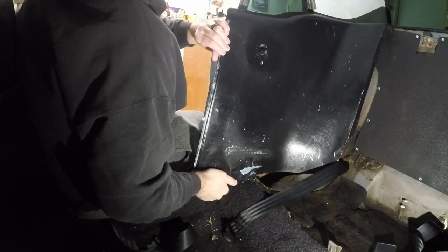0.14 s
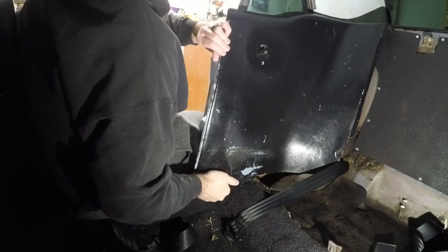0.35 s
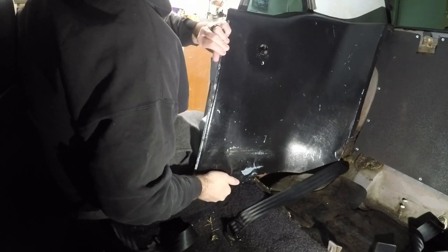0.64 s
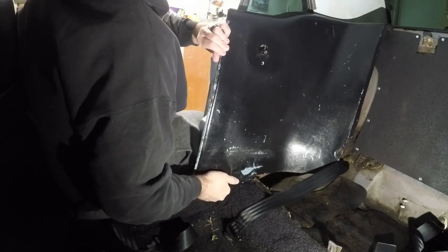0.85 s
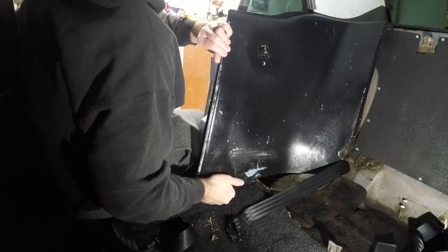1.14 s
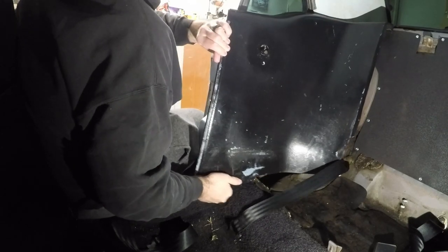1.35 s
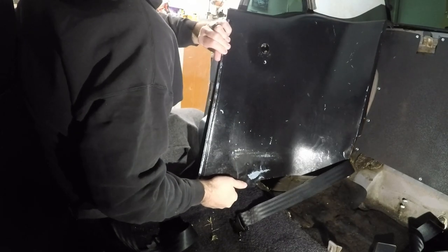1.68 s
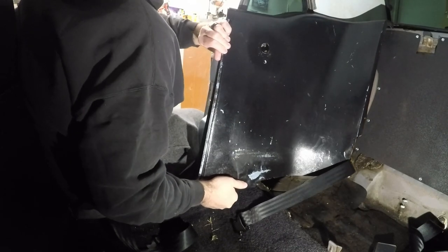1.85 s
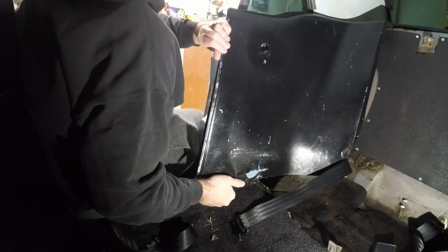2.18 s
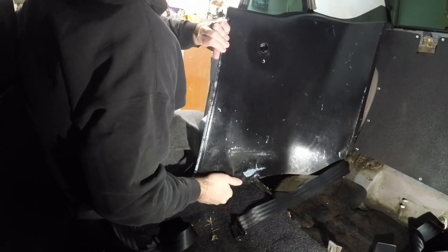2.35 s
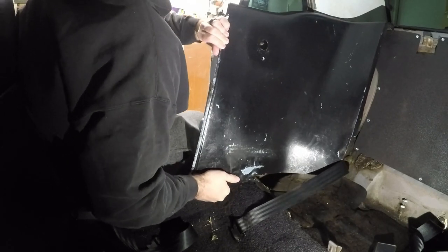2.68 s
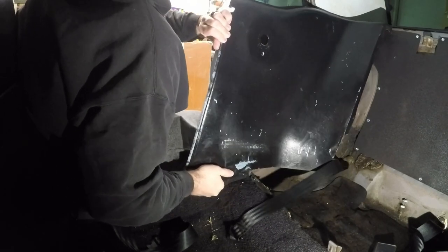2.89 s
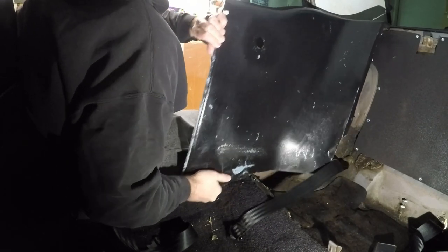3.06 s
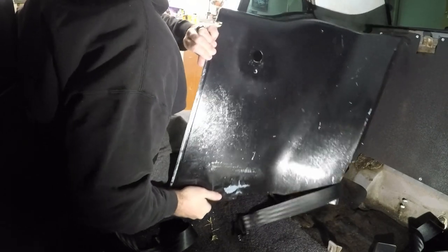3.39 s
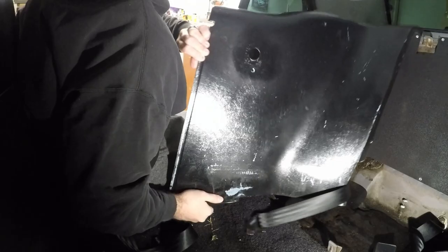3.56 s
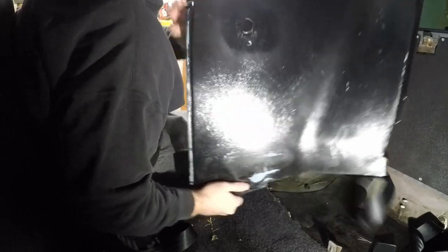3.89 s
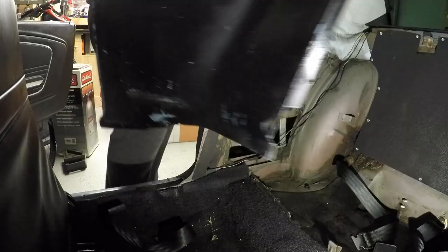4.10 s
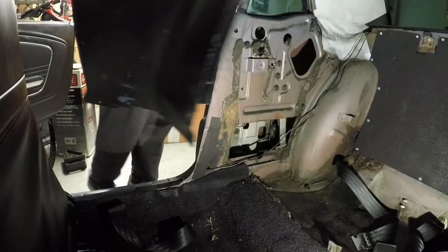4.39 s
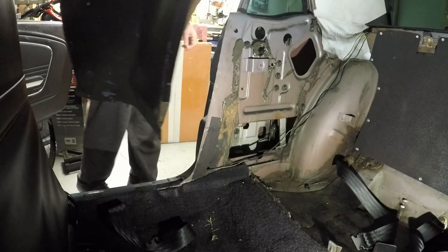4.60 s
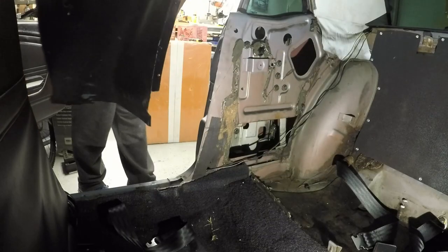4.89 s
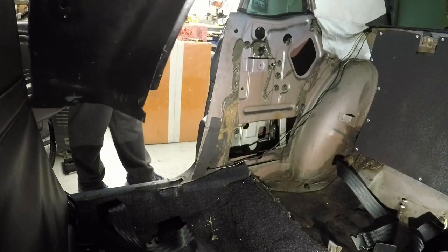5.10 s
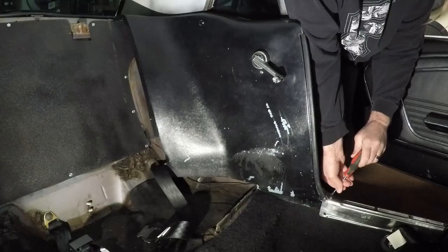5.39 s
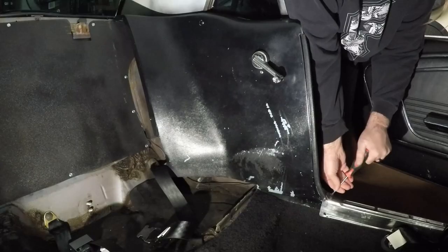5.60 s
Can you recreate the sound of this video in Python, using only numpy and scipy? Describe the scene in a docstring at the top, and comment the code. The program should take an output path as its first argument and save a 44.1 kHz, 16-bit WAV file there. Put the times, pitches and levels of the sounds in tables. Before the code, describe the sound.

Inside a car in a garage, a close, small microphone hears a large trim panel tugged free. At about 0.1 s a snap and heavy hollow thump boom through the shell. Thin squeaks and low creaks stutter from 0.3 to 0.9 s, with a dull thud at 0.9. Small knocks and scuffs lead to a strong crack and thump at 1.4 s, then lighter rubbing. Rough scuffs and a deep blow come at 2.5 s, followed by a very loud sharp snap at 2.75 with rattly knocks. Gritty scraping continues from 2.8 to 4.1 s, belt webbing hissing around 3.3 and 3.9. At 3.97 s a short hard hit overdrives the microphone, with a bright steel buckle clink and brief low note. Sound drops abruptly at 4.14: faint rubbing, panel rumble, wandering low boom, mains hum and thin whine, with a tiny click near 5.4 s.

```python
"""In a garage, a small microphone inside a car hears a large trim panel worked loose from the inner wall nearby.
Clips snap and edges scuff as shaped bursts of noise; the panel thumps, creaks and scrapes through its resonances.
A steel belt buckle clinks as decaying pairs of sines, and the webbing slides as noise in broad bands.
The car shell booms on a wandering low tone; behind it lie room noise, mains hum and a faint whine."""
import sys
import numpy as np
from scipy import signal
from scipy.fft import rfft, irfft
from scipy.io import wavfile
from scipy.ndimage import uniform_filter1d

SR = 44100
rng = np.random.default_rng(int(sys.argv[2]) if len(sys.argv) > 2 else 0)


def to_wav(s):
    """Save 16-bit WAV."""
    ch = np.atleast_2d(s).T  # columns
    pcm = np.round(np.clip(ch, -1, 1) * 32767)  # PCM
    wavfile.write(sys.argv[1], SR, pcm.astype(np.int16))


N = 253134
TOP_HZ = SR / 2.2  # upper edge of the widest treble bands

# the panel knocking on the wall: start_s, peak_db, blow_pitch_hz, ring (factor on the modes' ring time),
# narrow_db (lost one octave off the blow's pitch, growing as octaves squared)
THUMPS = [(0.033, -17.5, 202, 1, 16), (.085, -11.5, 415, 0.77, 2.5), (0.114, 0.5, 91, 0.62, 5),
          (.331, -18.5, 149, 0.93, 6.5), (0.477, -29, 330, 0.55, 6), (0.738, -18.5, 205, 1, 3.5),
          (.822, -19, 472, 0.22, 23), (0.926, -5.5, 78, 0.58, 1), (1, -35, 201.4, 0.93, 1),
          (1.058, -15.5, 138, 0.91, 7), (1.219, -16, 193, 1, 8), (1.394, -10, 202, 0.59, 19),
          (1.414, -10, 244, 0.37, 27), (1.439, -1.5, 150, 0.68, 1), (1.591, -15.5, 109.2, 1, 11),
          (1.907, -18, 317, 0.35, 8), (2.165, -34, 162, 0.81, 21), (2.377, -15, 133, 1, 6),
          (2.528, 0, 104, 1, 1), (2.559, -16, 90.8, 0.67, -0.5), (2.7445, 0, 413, 0.6, 2),
          (2.811, -9, 335, 1, 7), (2.85, -15, 692, 1, 30), (3.067, -21.5, 106, 0.44, 3),
          (3.154, -27.5, 810, 0.88, -1), (3.966, 8, 349, 0.16, 9), (4.116, -48, 200, 0.63, 12),
          (4.372, -39.5, 200, 0.93, 22)]
# resonances of the whole panel: pitch_hz, width_hz, level_db
PANEL = [(60.9, 2, -6), (96.6, 5.7, 8), (112.7, 4.2, 5), (140.8, 8.9, 2), (167.8, 45, -4), (199.7, 18, -4),
         (259.7, 26.4, -7.5), (343.6, 8, -2), (385, 15, -10.5), (463, 69, -18), (556, 108, -15),
         (603, 140, -17.5), (790, 32, -11.5), (942, 23, -14.5)]
# resonances of the panel's thin edge: pitch_hz, width_hz, level_db
EDGE = [(1320, 50, 0), (1580, 50, -2), (1930, 60, -1), (2550, 30, -3), (2950, 60, -4), (3370, 50, -4),
        (3810, 80, -4), (4430, 80, -5), (5200, 80, -7), (6300, 150, -8)]


def gain_of(db):
    """Decibels to gain."""
    return 10 ** (np.asarray(db) / 20)


def evened(x):
    """Scales to rms 1."""
    return x / np.sqrt(np.mean(x ** 2) + 1e-20)


def curves(rows):
    """Draws each column of a table of times as straight lines, at every sample."""
    s, *columns = np.vstack(rows).T
    return [np.interp(np.arange(N) / SR, s, column) for column in columns]


def swells(rows, rise_s, fall_s):
    """Sum of swells, each with a rounded rise and an exponential fall, from rows of peak_s, level_db."""
    t = np.arange(0, N, 64) / SR  # a coarse grid is enough for slow swells
    out = np.zeros(len(t))
    for peak_s, db in rows:
        rising = np.exp(-((t - peak_s) / rise_s) ** 2)
        falling = np.exp(-abs(t - peak_s) / fall_s)
        out += gain_of(db) * np.where(t < peak_s, rising, falling)
    return np.interp(np.arange(N) / SR, t, out)


def add(mix, start_s, sound):
    """Mixes a sound in at its start time, cut at the end of the mix."""
    part = mix[round(start_s * SR):][:len(sound)]
    part += sound[:len(part)]


def band(x, lo_hz, hi_hz):
    """Band-pass."""
    return signal.sosfilt(signal.butter(2, [lo_hz, hi_hz], "band", fs=SR, output="sos"), x)


def colour(x, points):
    """Shapes x by a spectrum of pitch_hz, level_db points, to rms 1."""
    hz = np.fft.rfftfreq(len(x), 1 / SR)
    point_hz, point_db = np.transpose(points)
    db = np.interp(np.log(hz + 1), np.log(point_hz), point_db)
    return evened(irfft(rfft(x) * gain_of(db), len(x)))


def resonate(x, modes):
    """Sum of two-pole resonances of pitch_hz, width_hz (at least 3), level_db."""
    out = np.zeros(len(x))
    for hz, width, db in modes:
        r = np.exp(-np.pi * max(width, 3) / SR)
        poles = [1, -2 * r * np.cos(2 * np.pi * hz / SR), r * r]
        out += gain_of(db) * signal.lfilter([1 - r, 0, r - 1], poles, x)
    return out


def grit(count, per_s, spread_db):
    """Noise with scattered grains of uneven size, as from a rough surface."""
    sizes = gain_of(spread_db * np.minimum(rng.exponential(1, count), 4))
    grains = sizes * (rng.random(count) < per_s / SR)
    envelope = 1 + signal.oaconvolve(grains, np.hanning(90))[:count]  # each grain lasts 2 ms
    return evened(rng.standard_normal(count) * envelope)


def drift(per_s):
    """Slow random wander of rms 1."""
    rolloff = 1 + (np.fft.rfftfreq(N, 1 / SR) / per_s) ** 4
    return evened(irfft(rfft(rng.standard_normal(N)) / rolloff, N))


def thump(peak_db, centre_hz, ring, narrow_db):
    """A blunt blow and its shudder ring the panel's modes, weighted by their distance from the blow's pitch."""
    t = np.arange(SR // 2) / SR
    push = np.sin(np.pi * np.minimum(2 * centre_hz * t, 1))  # half a cycle of contact
    shudder = evened(band(rng.standard_normal(len(t)), 40, 15.2 * centre_hz)) * np.sqrt(centre_hz / 3000)
    shudder *= (1 - np.exp(-t / 0.0043)) * gain_of(13.5 - 60 * t / (0.17 * ring))
    modes = [(hz, width / ring, db - narrow_db * np.log2(hz / centre_hz) ** 2)
             for hz, width, db in PANEL + EDGE]
    sound = resonate(push + shudder, modes)
    return gain_of(peak_db) * sound / abs(sound).max()


def snap(level_db, low_db, upper_db, treble_db, t60_s, rise_s):
    """A dense burst of cracks in four bands with their own decays, coloured by randomly weighted edge modes."""
    t = np.arange(SR // 2) / SR
    crack = grit(len(t), per_s=460, spread_db=-1.5)
    spot_db = 3 * rng.standard_normal(len(EDGE))  # each spot along the edge sounds different
    spot_modes = [(hz, width, db + s) for (hz, width, db), s in zip(EDGE, spot_db)]
    crack = crack + .5 * evened(resonate(crack, spot_modes))

    low = evened(band(resonate(crack, PANEL[7:]), 280, 1390))
    mid = evened(band(band(crack, 640, 3470), 593.6, 3300))
    upper = evened(band(band(crack, 3520, 5800), 1700, 7840))
    treble = evened(band(band(crack, 4400, TOP_HZ), 4500, 14100))

    low *= gain_of(low_db - 60 * t / (1.385 * t60_s))
    mid *= gain_of(-60 * t / t60_s)
    upper *= gain_of(upper_db - 60 * t / (1.03 * t60_s))
    treble *= gain_of(treble_db - 60 * t / t60_s)
    return gain_of(level_db - 9.5) * (1 - np.exp(-t / rise_s)) * (low + mid + upper + treble)


def note(hz, db, t60_s, rise_s):
    """One part of the panel as a damped sine that starts 4 % sharp, settles and flutters a little in level."""
    t = np.arange(SR // 2) / SR
    pitch = hz * (1 + .04 * np.exp(-t / .012))
    smooth = uniform_filter1d(uniform_filter1d(rng.standard_normal(len(t)), size=300), size=300)
    level = gain_of(db - 60 * t / t60_s + 2 * evened(smooth))
    return level * (1 - np.exp(-t / rise_s)) * np.sin(2 * np.pi * np.cumsum(pitch) / SR)


def creak():
    """Quick uneven slips ring the strained panel's resonances, each twice over for dark gaps between them."""
    # the panel creaking under strain: time_s, squeak_db, high_squeak_db, low_creak_db
    strain = [(0.2, -74, -84, -76), (0.334, -56, -60, -56), (0.44, -64, -80, -64), (0.56, -64, -59, -68),
              (0.58, -45, -60, -39), (0.602, -56, -58, -46.5), (0.736, -42.5, -50, -40.5),
              (0.958, -56, -68, -49), (1.0, -64, -75, -62)]
    # resonances of the squeak, then of the high squeak: pitch_hz, width_hz, level_db
    squeak_modes = [(4240, 170, 0), (4500, 200, -4), (3900, 200, -8)], [(5180, 110, 0), (5950, 130, 0)]
    # resonances of the low creak: pitch_hz, width_hz, level_db
    low_modes = [(1250, 170, 0), (1560, 100, 0), (1750, 110, -4), (2070, 100, -1), (2460, 110, -4),
                 (2890, 110, -2), (3080, 110, -4), (3450, 170, -4)]
    t = np.arange(N) / SR
    slips = grit(N, per_s=540, spread_db=-1.0)
    sound = np.zeros(N)
    for level_db, modes in zip(curves(strain), [*squeak_modes, low_modes]):
        rung = np.zeros(N)
        for hz, width, db in modes:
            once = resonate(slips, [(hz, width, db)])
            rung += resonate(once, [(hz, width, 0)])
        sound += gain_of(level_db) * evened(rung)
    return sound * ((t > strain[0][0]) & (t < strain[-1][0]))


def rubbing():
    """Gritty friction in the mids and treble; handling stirs the panel's modes, which swell after each knock."""
    # hands and panel edges rubbing: time_s, scrape_db, treble_fizz_db
    rub = [(0.0, -46, -57), (0.2, -70, -68), (0.6, -54.5, -62.5), (0.73, -42, -56), (0.8, -54, -60.5),
           (1.3, -51.5, -61), (1.56, -43.5, -56), (1.73, -49, -60.5), (2.0, -57, -63), (2.74, -50, -62),
           (2.82, -46, -45), (2.94, -43, -59), (3.1, -42.5, -42.5), (3.3, -45.5, -58), (3.58, -45, -57),
           (3.73, -42.5, -63), (3.89, -42, -42.5), (4.12, -47, -62), (4.16, -61, -62.5),
           (4.6, -51.5, -61.5), (5.74, -55, -62.5)]
    # spectrum of the scrape: pitch_hz, relative_level_db (per Hz)
    scrape_spectrum = [(240, -49), (400, -4), (467, -2.5), (661, -12), (1310, -4.5), (1660, -5.5),
                       (2440, -5.5), (7000, -23), (9100, -31), (15400, -120)]
    # rumble of the panel in the hands: time_s, level_db
    held = [(0.0, -41), (0.6, -50.5), (1.6, -35), (2.0, -47), (3.3, -45), (3.6, -40), (4.12, -40),
            (4.14, -50.5), (4.4, -41.5), (5.2, -45), (5.56, -39.5), (5.74, -43.5)]
    scrape_db, fizz_db = curves(rub)
    rough = grit(N, per_s=290, spread_db=-13.5)
    edged = colour(rough, scrape_spectrum) + 0.07 * evened(resonate(rough, EDGE))
    scrape = gain_of(scrape_db) * evened(edged)
    fizz = gain_of(fizz_db) * evened(band(rough, 5100, TOP_HZ))

    lag_s, fall_s = 0.042, 0.043  # the rumble peaks a little after the knock
    knocks = [(s + lag_s, -25.5 + 0.47 * peak_db) for s, peak_db, *_ in THUMPS]
    stirred = gain_of(curves(held)[0]) + swells(knocks, lag_s, fall_s)
    modes = resonate(grit(N, per_s=95, spread_db=2.5), PANEL[:9])
    rumble = stirred * evened(band(modes, 50, 710))
    return scrape + fizz + rumble


def buckle():
    """Steel modes start as the parts strike; each beats against a weaker twin and wavers as the parts rattle."""
    # modes of the steel buckle: struck_s, pitch_hz, twin_offset_hz
    steel_modes = [(3.988, 3397, -6), (3.981, 5040, 30), (3.995, 5814, 8), (3.988, 7187, -14),
                   (3.981, 8345, -11), (3.985, 9335, 12), (3.985, 11270, 10), (3.988, 11735, -14),
                   (3.985, 13240, 9), (3.987, 13585, -19), (3.99, 15200, 16)]
    # strength of each mode, in the same order: level_db, t60_s
    strengths = [(-18, 0.24), (-14, 0.17), (-24, 0.18), (-19.5, .18), (-15.5, 0.16), (-35, 0.13),
                 (-40, 0.19), (-16, 0.13), (-31, 0.074), (-9, 0.13), (-39, 0.17)]
    t, out = np.arange(N) / SR, np.zeros(N)
    for (s, hz, twin_hz), (db, t60_s) in zip(steel_modes, strengths):
        age = np.maximum(t - s, 0)
        pair = np.sin(2 * np.pi * hz * age) + .45 * np.sin(2 * np.pi * (hz + twin_hz) * age)
        level = gain_of(db - 60 * age / t60_s + 2.4 * drift(35.3))
        out += level * (1 - np.exp(-age / 0.00091)) * pair
    return out


def slide():
    """Belt webbing, a woven strap, hisses unevenly over an edge in a few broad bands."""
    # the webbing sliding along the panel: time_s, level_db
    path = [(3.22, -67), (3.232, -62), (3.336, -43), (3.474, -55.5), (3.768, -51), (3.896, -34),
            (3.958, -53), (3.965, -52)]
    # broad bands of its hiss: pitch_hz, width_hz, level_db
    webbing = [(3380, 1300, 10.5), (4200, 580, -18.5), (8360, 1500, -7.5)]
    t = np.arange(N) / SR
    db, = curves(path)
    weave = band(resonate(grit(N, per_s=120, spread_db=-4.5), webbing), 2000, 11000)
    return gain_of(db + 2 * drift(25)) * evened(weave) * ((t > path[0][0]) & (t < path[-1][0]))


def shell():
    """One low mode that wanders in pitch, with looser rumble around it; each lurch of the car swells it."""
    # the car lurches as the panel is tugged and weight shifts, swelling the boom: peak_s, level_db
    lurches = [(0.14, -11.5), (0.24, -19), (0.34, -21), (0.51, -20.5), (0.96, -12.5), (1.45, -15.5),
               (1.6, -11.5), (1.66, -15), (1.84, -20), (1.95, -23), (2.45, -21), (2.53, -32), (2.78, -8.5),
               (2.94, -14.5), (3.1, -19.5), (3.18, -18), (5.18, -33.5), (5.5, -21.5), (5.61, -22.5)]
    # the boom of the car shell between lurches: time_s, mean_pitch_hz, mean_level_db
    boom = [(0.0, 51.12, -22), (0.3, 46.65, -24.5), (0.65, 46.43, -26), (1.15, 45.75, -23),
            (1.36, 47.17, -12.5), (1.5, 50.67, -23), (2.05, 48.91, -28), (2.3, 46.3, -25),
            (2.65, 44.27, -19), (3.0, 41.07, -23.5), (3.45, 48.76, -29.5), (3.68, 49.1, -20.5),
            (3.9, 48.63, -20), (4.09, 40.55, -33), (4.25, 48.45, -24), (4.5, 42.05, -28.5),
            (4.65, 46.52, -23), (4.97, 46.27, -21), (5.05, 46.85, -26.5), (5.39, 45.68, -33.5),
            (5.74, 49.3, -17)]
    hz, db = curves(boom)
    wandering_hz = hz * (1 + 0.0594 * drift(21))
    tone = np.sqrt(2) * np.sin(2 * np.pi * np.cumsum(wandering_hz) / SR)
    loose = evened(band(band(rng.standard_normal(N), 24, 80.5), 24, 80.5))
    level = gain_of(db + 0.96 * drift(8.6)) + swells(lurches, rise_s=0.027, fall_s=0.026)
    return level * evened(tone + 0.66 * loose)


def cabin(x):
    """Short dull tail of the car's inside and the garage, as decaying band-limited noise."""
    t = np.arange(SR // 3) / SR
    tail = band(rng.standard_normal(len(t)), 100, 5200) * gain_of(-60 * t / 0.11) * (t > .004)
    return signal.oaconvolve(x, tail / np.linalg.norm(tail))[:N]


def garage():
    """Coloured room noise, mains hum as a sine and a faint whine of narrow noise, all drifting in level."""
    # spectrum of the room noise: pitch_hz, relative_level_db (per Hz)
    room = [(41, 7), (70, -4.5), (165, -19), (271, -14.5), (311, -42), (364, -43), (670, -29.5), (767, -19),
            (1810, -31), (2320, -39.5), (3260, -31.5), (4570, -30.5), (11500, -45), (14500, -65),
            (15500, -80.5)]
    # mains hum: pitch_hz, mean_level_db
    mains = [(120, -47)]
    # faint whine: pitch_hz, width_hz, mean_level_db
    whines = [(2286, 110, -70), (2240, 120, -60.5), (2490, 110, -64)]
    t = np.arange(N) / SR
    sound = gain_of(-39.5 + 2.3 * drift(7.1)) * colour(rng.standard_normal(N), room)
    for hz, db in mains:
        sound += gain_of(db + 2.7 * drift(5)) * np.sin(2 * np.pi * hz * t)
    for hz, width, db in whines:
        whine = evened(resonate(rng.standard_normal(N), [(hz, width, 0)]))
        sound += gain_of(db + drift(2)) * whine
    return sound


def scene():
    """All sources, mono; hits, notes and buckle begun before cut_s stop short there, with their tails."""
    # clips and edges letting go: start_s, level_db (before a common trim),
    # low_db, upper_db, treble_db (all three over the mid band), mid_t60_s
    snaps = [(0.0795, -9, -5, -13.5, -25.5, 0.12), (0.9284, -27.5, -21, -28, -27, 0.077),
             (1.0036, -34.5, -9, -2, -4.5, 0.19), (1.2017, -34.5, 5.5, 2.5, -5, 0.22),
             (1.2351, -29.5, 6.5, -1.5, -10, 0.17), (1.391, -28.5, 13.5, -7, -11.5, 0.16),
             (1.438, -2.5, 0, -5, -25, 0.11), (1.9006, -20, -15, -3, -12.5, 0.11),
             (2.7435, 1, 3, -1.5, -5.5, 0.11), (3.5287, -23.5, -40, -27, -12, 0.065),
             (3.9653, 4.5, 6, -8, -26, 0.03), (3.9796, -18, -11.5, 6.5, 5, 0.18),
             (4.0894, -38, 0, 3.5, -10, 0.26), (4.118, -24.5, -1, -17, -21, 0.14),
             (5.4261, -35, -9, -3, -14, 0.077)]
    # edges dragging briefly over the frame, with a soft start: same columns as the snaps
    scuffs = [(0.024, -23, 0, -0.5, -6.5, 0.16), (0.3326, -35.5, -4, -17, -6, 0.14),
              (0.7559, -28.5, -24, -22, -14, 0.3), (0.8214, -32, 20.5, -31, -21, 0.089),
              (1.079, -27, -19, -2, -10, 0.12), (1.591, -27.5, -17, -23, -31, 0.16),
              (2.2154, -37, -18, -2, -13, 0.32), (2.366, -30, 0.5, -6.5, -13, 0.74),
              (2.5079, -6, 3.5, -3, -7.5, 0.17), (2.5254, -2.5, -2.5, 2, -8, 0.079),
              (2.7774, -3, -7, -5.5, -11, 0.099), (2.88, -24.5, 6.5, -3, -6, 0.19),
              (2.9908, -27.5, -15, 3, -10, 0.12), (3.0713, -30, 6.5, -1.5, -20, 0.54),
              (3.1486, -30, 18.5, 5, -33, 0.17), (4.4245, -35.5, -31, -24, -23, 0.37),
              (5.0992, -25.5, -23, -12, -22, 0.081)]
    # one part of the panel sounding a single note: start_s, settled_pitch_hz, level_db, t60_s, rise_s
    notes = [(0.575, 1298, -22, 0.076, 0.004), (.82, 830, -23, 0.05, 0.0018),
             (0.827, 477, -21, 0.32, 0.0031), (1.455, 2526, -30, 0.31, .006),
             (2.85, 632, -10.5, 0.11, 0.0032), (3.165, 660, -15, 0.084, 0.0072),
             (3.17, 1882, -23, 0.12, 0.0095), (3.198, 342, -28, 0.25, 0.016),
             (4.005, 145.5, -9.5, 0.27, 0.015)]
    snap_rise_s, scuff_rise_s, cut_s = .00045, 0.0082, 4.137
    cracks = [(*row, snap_rise_s) for row in snaps] + [(*row, scuff_rise_s) for row in scuffs]

    before, after = buckle(), np.zeros(N)
    for play, rows in ((snap, cracks), (thump, THUMPS), (note, notes)):
        for start_s, *settings in rows:
            add(before if start_s < cut_s else after, start_s, play(*settings))
    gate = np.clip((cut_s - np.arange(N) / SR) / .002, 0, 1)  # closes over 2 ms
    hits = gate * (before + gain_of(-15) * cabin(before))
    hits += after + gain_of(-15) * cabin(after)
    return (hits + creak() + rubbing() + slide() + shell() + garage())[None]


def record(dry):
    """The microphone input clips on the loudest blows; then a steep low-pass limits the band."""
    clipped = np.clip(dry, -1, 1)
    low_pass = signal.firwin(511, 15500, window=("kaiser", 9), fs=SR)  # cutoff in Hz
    return signal.oaconvolve(clipped, low_pass[None], "same")


dry = scene()
out = record(dry)
to_wav(out)
```